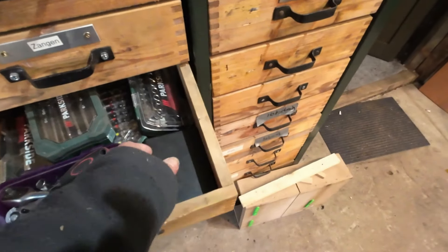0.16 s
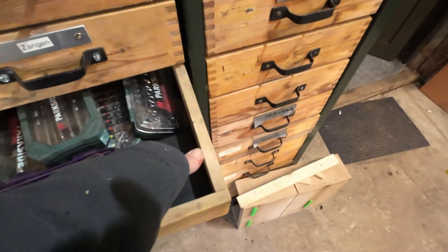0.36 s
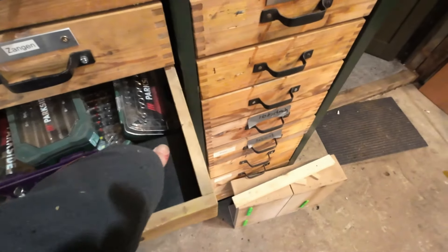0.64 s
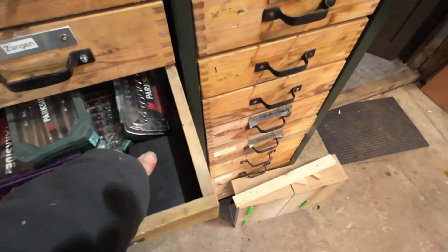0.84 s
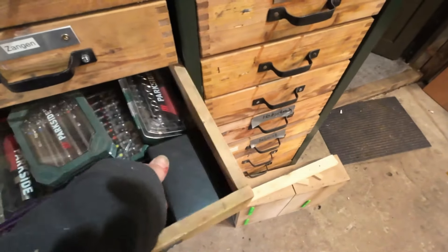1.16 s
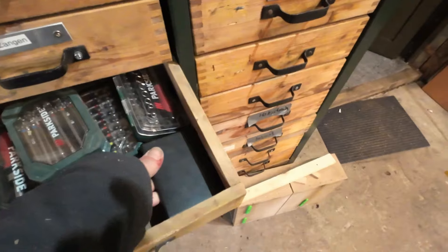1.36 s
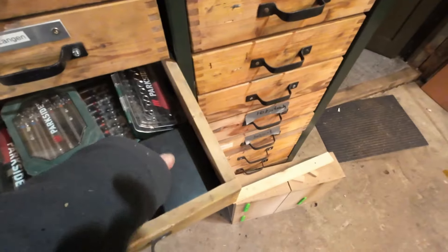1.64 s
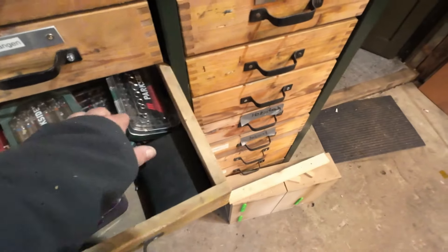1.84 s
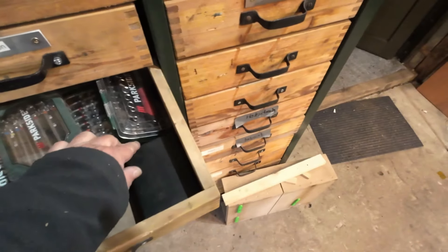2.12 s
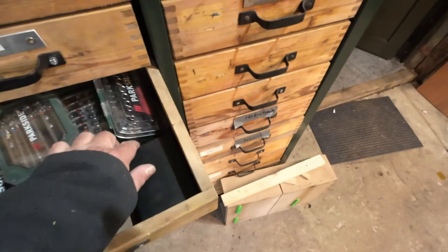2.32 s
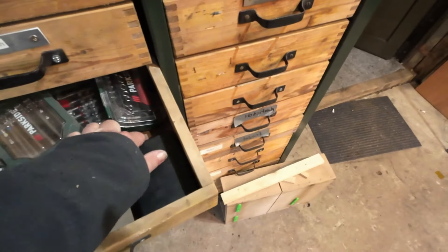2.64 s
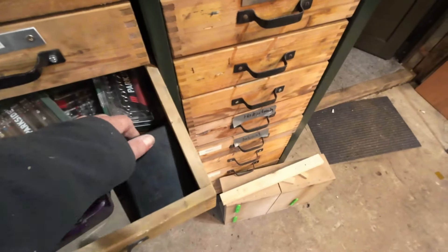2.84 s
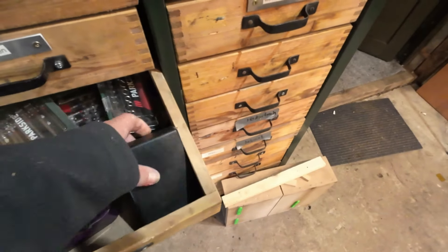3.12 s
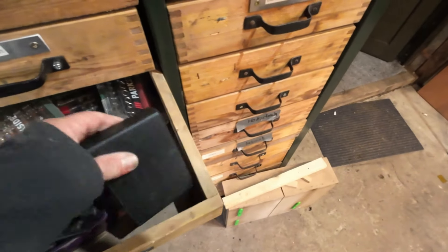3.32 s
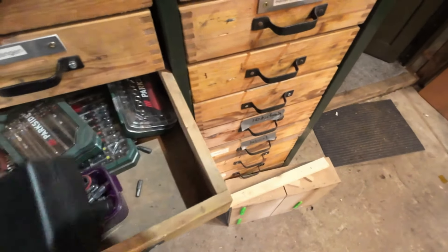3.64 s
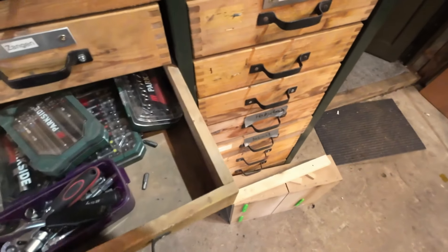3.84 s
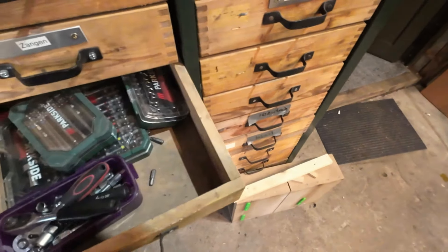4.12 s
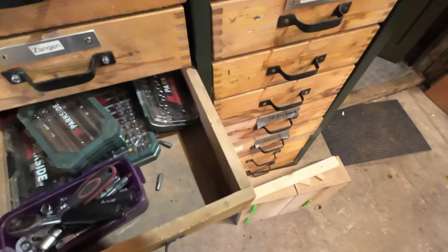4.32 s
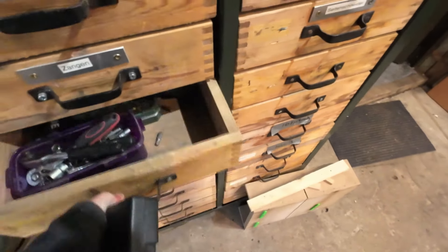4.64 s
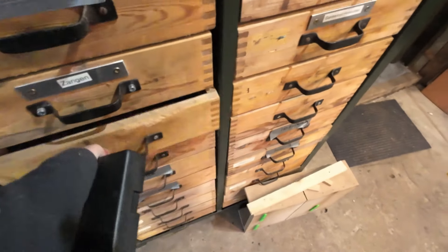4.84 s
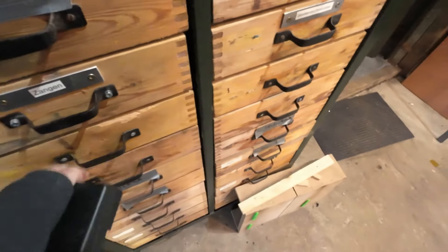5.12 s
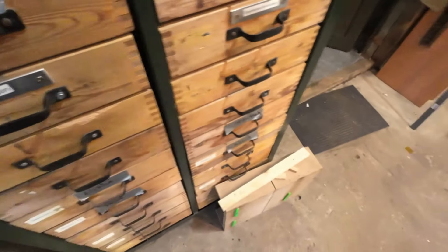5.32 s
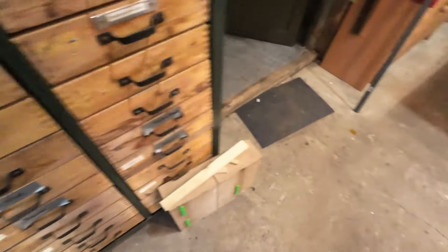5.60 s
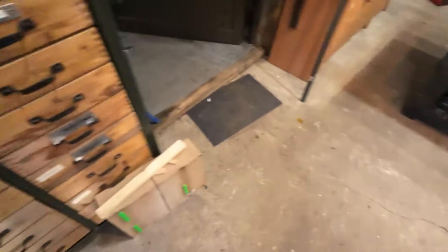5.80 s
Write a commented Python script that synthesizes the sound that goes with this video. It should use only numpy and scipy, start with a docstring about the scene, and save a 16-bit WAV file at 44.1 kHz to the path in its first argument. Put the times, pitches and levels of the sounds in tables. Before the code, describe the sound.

Sharp, bright plastic clacks and tiny metallic rattles over dull wooden knocks, with dragging and sleeve rustle between. The busiest rummaging comes early, softer taps follow, a hollow case slides out, then a pause. A hard knock starts the drawer moving; it scrapes inward, steel bits chink, and it closes with a woody thump. Close body-worn stereo microphone, short room echo, low wind-like puffs at the end.

```python
"""Small workshop: a hand rummages among plastic tool cases in an open wooden drawer, lifts one out, shuts it.
Contacts are blows and chatter heard through modes of wood, plastic shells and loose bits, with a room echo.
Rubs are noise in stick-slip grains; loose things rattle along; the lifted case rasps; steel bits ring. Air
buffets the two ports of a worn camera over a faint hiss of room and microphone."""
import sys
import numpy as np
from scipy import signal
from scipy.fft import rfft, irfft, next_fast_len
from scipy.io import wavfile
from scipy.ndimage import map_coordinates

SR = 44100
rng = np.random.default_rng(int(sys.argv[2]) if len(sys.argv) > 2 else 0)


def to_wav(sig):
    """Store sig (one row per channel, or 1-D mono) as 16-bit WAV at the path in sys.argv[1].

    Samples outside -1..1 are clipped; the rate is SR.
    """
    pcm = np.clip(np.atleast_2d(sig), -1, 1) * 32767
    pcm = np.round(pcm).astype(np.int16)
    wavfile.write(sys.argv[1], SR, pcm.T)  # frames by channels


N = 263277

# modes of the open drawer, its front, and the drawer in its cabinet: pitch_hz, width_hz, level_db
DRAWER_MODES = [(87.7, 19, -16.5), (185, 90, -9), (376.7, 80, -2.5), (564, 144, -5), (713.4, 182, -8)]
FRONT_MODES = [(237, 200, -9), (376, 131, -4), (472, 53, -1.5), (647, 60, -3.5), (840, 256, -10.5)]
CABINET_MODES = [(125, 71, -14.5), (206.5, 30, -1.5), (264.4, 151, -3.5), (432, 130, -9), (547, 42, -1.5),
                 (994, 270, -16)]
# modes of plastic case shells, of loose bits, of the lifted case: pitch_hz, width_hz, level_db
SHELL_MODES = [(950, 180, -4), (1195, 270, -0.5), (1403, 173, 1.5), (1595, 150, -2.5), (1837, 170, -1.5),
               (2096, 260, -4.5), (2400, 214, -3), (2621, 350, -6.5), (3266, 690, -11.5)]
BIT_MODES = [(3020, 380, 2.5), (5250, 380, 11.5), (5580, 3100, 6.5), (7920, 630, 5), (10220, 1600, 7.5),
             (12000, 14000, -0.5), (15300, 2600, 6.5)]
LIFTED_MODES = [(315, 13, -2), (616, 66, -1), (771, 39, 2.5), (1220, 160, -12), (1680, 42, -10),
                (1910, 59, -9), (3280, 140, -18.5), (5070, 510, -29.5)]
# small hollows that colour every rub: pitch_hz, width_hz, level_db
HOLLOW_MODES = [(2040, 980, 3), (2800, 290, 9.5), (3450, 160, 10), (4970, 400, 9.5), (5860, 400, 6),
                (7600, 260, 5), (10100, 2100, 5.5)]

# noise spectra of room tone, buffeting, drag on wood, plastic scrape, cloth and skin: freq_hz, density_db_per_hz
ROOM_TONE_SPECTRUM = [(59, -22), (100, -18.5), (177, -25.5), (255, 0), (308, -11), (634, -6.5), (950, -10),
                      (10900, -31), (16000, -37)]
BUFFET_SPECTRUM = [(5.9, -25.5), (10, 12), (63, -4), (143, -25), (188, -43.5), (226, -35.5), (300, -33),
                   (390, -68), (660, -120)]
DRAG_SPECTRUM = [(47, -38), (80, -2), (239, -5), (384, -8.5), (431, -7.5), (735, -7), (995, -15.5),
                 (1310, -13.5), (2500, -37.5), (3250, -52.5), (5500, -120)]
SCRAPE_SPECTRUM = [(500, -28.5), (1000, -0.5), (2000, 0), (3000, -2.5), (4200, -8), (8000, -21)]
CLOTH_SPECTRUM = [(1760, -24), (3000, -16), (4290, -18.5), (5820, -12), (6570, -9.5), (8870, -13.5),
                  (11100, -8.5), (13200, -16), (15800, 5.5), (16200, -32), (16500, -69.5)]

# left-right likeness of drawer sound and of room tone: freq_hz, likeness_0_to_1
DRAWER_LIKENESS = [(60, 1), (300, 1), (700, 1), (1400, 1), (3100, 0.99), (4600, 0.84), (6800, 0.81),
                   (15000, 0.23)]
ROOM_LIKENESS = [(100, .9), (1000, .85), (8000, .2)]
# reverberation time: freq_hz, t60_s
SHOP_T60 = [(100, 0.31), (300, 0.35), (700, 0.17), (2000, 0.28), (6000, 0.28), (14000, 0.07)]
# strength of the room's answer: freq_hz, level_db
WALL_RESPONSE = [(100, -7.5), (250, 0), (1000, -0.5), (4000, -13), (12000, -10)]
# drawer sound, left over right: freq_hz, balance_db
LEFT_OVER_RIGHT = [(1500, 0.5), (2400, 0.5), (4400, 3.5), (8000, -0.6)]
# microphone response: freq_hz, level_db
MICROPHONE_RESPONSE = [(3400, -0.5), (4100, 1.5), (4800, 2), (10500, -3.5), (12000, -3), (13300, -15.5),
                       (15500, -23.5)]

# buffeting: time_s, level_db
AIR_LEVELS = [(0, -48.5), (.24, -48.5), (.35, -42), (.51, -49), (.83, -40.5), (.97, -48.5), (1.07, -43),
              (1.34, -36), (1.7, -48.5), (1.79, -42), (2.07, -52), (2.44, -49), (2.66, -43.5),
              (2.79, -47.5), (2.95, -48), (3.31, -53), (3.95, -51), (4.72, -46), (4.95, -52), (5.03, -38.5),
              (5.4, -48), (5.72, -49.5)]
# single puffs on the ports as the camera swings round: time_s, level_db
AIR_PUFFS = [(5.762, -32), (5.779, -32.5), (5.842, -26.5), (5.872, -37), (5.908, -26.5), (5.956, -30)]
# strokes of hand, sleeve and cases: start_s, swell_s, hold_s, drag_db, scrape_db, cloth_db
RUB_STROKES = [(-.02, 0.01, 0.0046, -46, -58.5, -62), (0.02, 0.037, 0.0035, -45, -65, -58),
               (0.173, 0.021, 0.097, -52, -62, -53), (0.336, 0.0068, 0.042, -47.5, -57, -49.5),
               (0.403, 0.021, 0.14, -59.5, -80.5, -66), (0.537, 0.0094, 0.028, -70, -78, -62.5),
               (0.61, 0.0078, 0.018, -61, -67.5, -52), (0.69, 0.055, 0.0095, -42.5, -55.5, -49.5),
               (0.897, 0.025, 0.063, -52, -65, -51.5), (0.964, 0.051, 0.039, -43, -60, -55),
               (1.016, 0.023, 0.019, -36.5, -40.5, -43), (1.069, 0.016, 0.16, -57, -49.5, -49.5),
               (1.13, 0.08, 0.049, -39.5, -41.5, -41), (1.313, 0.031, 0.18, -49, -58, -58),
               (1.692, 0.04, 0.029, -48.5, -54, -52), (1.78, 0.0071, 0.079, -60, -49.5, -55),
               (1.91, 0.0087, .04, -52, -56, -58), (1.891, 0.078, 0.068, -62, -75, -69),
               (2.169, 0.0057, 0.015, -49.5, -63.5, -53.5), (2.327, 0.043, 0.021, -54, -66, -65),
               (2.454, 0.024, 0.086, -50, -60.5, -57), (2.497, 0.052, 0.036, -51, -52.5, -46.5),
               (2.602, 0.013, 0.021, -48, -57.5, -53), (2.7, 0.005, 0.0075, -47, -63, -63),
               (2.741, 0.013, 0.025, -45.5, -62, -59), (2.826, 0.016, 0.0062, -39, -59.5, -58),
               (2.909, 0.022, 0.1, -53, -70, -67), (3.046, 0.016, 0.017, -52.5, -56, -51.5),
               (3.14, 0.032, 0.026, -45.5, -55, -46.5), (3.24, 0.034, 0.022, -53, -61.5, -53.5),
               (3.6, 0.13, 0.044, -57, -64.5, -54), (3.727, 0.14, 0.11, -81, -71, -50),
               (4.033, 0.023, 0.0079, -53.5, -67, -55), (4.111, 0.0055, 0.04, -35, -45.5, -44),
               (4.982, 0.0048, 0.053, -25.5, -45.5, -53), (5.098, 0.019, 0.06, -52, -67, -73),
               (5.201, 0.013, 0.035, -56, -66.5, -88), (5.246, 0.013, 0.096, -62, -99, -100),
               (5.453, 0.049, 0.06, -72.5, -67.5, -59), (5.722, 0.11, 0.055, -67, -58, -46)]
# between strokes: drag_db, scrape_db, cloth_db
IDLE_LEVELS = [-72.5, -82, -72.5]
# the drawer runs in: time_s, drag_db, scrape_db, cloth_db
SLIDE_LEVELS = [(4.19, -74, -69, -53), (4.23, -36.5, -51.5, -47), (4.3, -47, -55.5, -54),
                (4.34, -42, -42, -75), (4.365, -48.5, -57, -57), (4.52, -49.5, -60.5, -55.5),
                (4.58, -49.5, -57.5, -46), (4.73, -44, -48.5, -41), (4.83, -51, -50.5, -43),
                (4.98, -48.5, -53.5, -47.5)]
# contacts: start_s, tick_db, knock_re_tick_db, clack_re_tick_db, chatter_s (scaled per body),
# wood_tilt_db_per_octave
CONTACT_EVENTS = [(0.068,-25,-18,-16,0.004,8),(0.262,-52.5,4,6,0.0052,1),(0.2755,-52.5,18.5,16,0.0053,-3),(0.318,-33,17.5,0,0.015,6.5),(0.324,-29.5,1.5,8.5,0.0041,-4.5),
                  (0.3338,-32,11,6.5,.009,-13),(.346,-42,-10,17,0.0048,4),(0.361,-38,-20,-22,.006,0.5),(.418,-37,-7,-24,0.0069,-7),
                  (0.65,-43.5,1,-8.5,.0045,-4),(0.7172,-55,26.5,8,0.014,2),(0.765,-49,13,-3,0.0083,0),(0.817,-40.5,-9,-15,0.0057,1),
                  (1.026,-19.5,-26,-8.5,0.0066,11),(1.0364,-15,-3,0.5,0.0063,5),(1.181,-19,4.5,-6,0.018,2.5),
                  (1.191,-19.5,-8.5,-4.5,.008,-13),(1.224,-42,13,15,0.007,10),(1.231,-30,12.5,11.5,0.0062,-0.5),(1.2378,-23.5,5,-1.5,0.02,12),(1.2516,-32,7,-7,0.0076,-5),
                  (1.261,-37,13.5,-2,0.011,0),(1.282,-42,12.5,11,0.0061,7),(1.295,-36,11,5,.008,-7.5),(1.308,-21.5,-9,1,0.0049,-4),(1.323,-37.5,3,6,0.0034,-9),
                  (1.356,-51.5,18.5,-3,0.013,-13),(1.3886,-28,-21,-9,0.0054,-4.5),(1.417,-37,3.5,2,0.0055,-13),(1.459,-35,-16.5,-24.5,0.0034,4.5),
                  (1.474,-37,-3.5,-6,0.0056,-1.5),(1.491,-42,3,13.5,0.005,-5),(1.514,-33,-4,-6,0.0041,-4.5),(1.527,-36,5.5,-4.5,0.0089,-8),
                  (1.762,-34,12,7,0.0067,3.5),(1.781,-11.5,10,3.5,0.0096,0.5),
                  (1.7888,-18,4,-7,0.02,-2.5),(1.804,-31.5,8.5,-6,0.011,-9),(1.819,-37,-13.5,8,0.01,1.5),(1.838,-21,-8.5,-8.5,.009,2),
                  (1.9029,-27,20.5,16.5,0.0033,10),(1.911,-33.5,1.5,13,0.0036,3),(1.9687,-41,20.5,18.5,0.011,9.5),(1.996,-26,-2,-6.5,0.015,7.5),
                  (2.1721,-44.5,16.5,5,0.0038,-1.5),(2.216,-57,15,15.5,0.0056,-9),(2.223,-42,10.5,-2.5,0.0073,-2),(2.328,-62.5,27.5,4,0.013,-6.5),(2.401,-49.5,13.5,5.5,0.0054,-1),
                  (2.5913,-25,6.5,-9.5,0.0037,2.5),(2.619,-39,-5,-22,0.0223,-11),(2.654,-54.5,26,-5,0.0093,-3.5),(2.6855,-39.5,18.5,7,0.0043,2),
                  (2.7,-58,29,5,0.0075,4),(2.71,-31.5,-5,-16,0.0061,-7),(2.7556,-38.5,4.5,5.5,0.0038,-2),(2.807,-54.5,-7,10,0.0011,0.5),(2.814,-55.5,21.5,13.5,.006,-9.5),(2.84,-43,10.5,-11,0.012,11),(2.854,-36,7.5,-0.5,0.006,4),
                  (2.867,-38.5,-21,-5,0.0073,0.5),(2.898,-39,1,-12,0.015,-8),(2.9784,-48,20.5,15.5,0.0078,6),(2.993,-41,-5,-17,.008,-4),
                  (3.036,-35,-20,-11.5,0.01,5),(3.077,-34.5,16.5,14,0.0069,-3.5),(3.151,-42,13.5,-16,0.0093,-1),(3.175,-43,-1,7.5,0.0079,-2),
                  (3.708,-55.5,20.5,9.5,0.0059,8),(3.715,-36,-4.5,-17,0.0036,18),(3.734,-49,10,-6,.006,12),(3.779,-43,8,1,0.0025,13.5),(3.787,-59.5,24,12.5,0.0067,15),
                  (4.019,-55,21.5,-1,0.0093,2),(4.039,-30,-27,-16,0.0092,-2),(4.0618,-41.5,2,0.5,0.025,-6),
                  (4.1085,-13.5,3.5,4.5,0.009,3.5),(4.131,-22,8.5,-0.5,0.0091,6.5),(4.1623,-40,-7,8.5,0.0081,5),(4.222,-42.5,-2,7,0.0071,-7),
                  (4.2312,-33.5,-7,7.5,.007,9),(4.275,-40.5,10,6,0.0058,1),(4.314,-37,6.5,-13,0.024,21),(4.329,-46,14,14.5,.012,9),(4.341,-35.5,8,9.5,0.016,-4.5),
                  (4.436,-27,-13,-10.5,0.012,-2),(4.579,-28.5,-7,-9.5,0.016,-0.5),(4.587,-26.5,-7.5,-2.5,0.016,-10),(4.6704,-24,-17,-13,.01,2),(4.695,-40.5,21,7,0.0086,-6),
                  (4.721,-26.5,-32,-33,0.018,4.5),(4.78,-38.5,-3,-1.5,0.018,12),
                  (4.924,-49.5,17,-12,.014,-1),(4.983,-16,10,2.5,0.011,-0.5),(4.998,-29.5,6.5,5.5,.015,10.5),
                  (5.0098,-31.5,-19,10.5,0.0082,2),(5.0234,-55.5,32.5,27,0.012,13),(5.052,-63,23,13,0.011,-8.5),(5.089,-50,11,7,0.01,2),
                  (5.1072,-44,-15,2.5,0.025,5),(5.1302,-43.5,6.5,-14,0.016,-5),(5.2157,-60,23,12,0.0072,-10),(5.24,-69,30.5,23.5,0.012,3),
                  (5.367,-68.5,23.5,-7,0.014,-12),(5.542,-71,19,10.5,0.019,9)]
# small steel bits: start_s, pitch_hz, level_db
CHINK_EVENTS = [(1.256, 2330, -19), (1.344, 3600, -36), (1.868, 1850, -28), (4.66, 4800, -37),
                (4.673, 6900, -27), (4.706, 3300, -27.5), (4.72, 2900, -35), (4.738, 4700, -32),
                (4.782, 5960, -31)]
# one case slides out past its neighbours: time_s, level_db
LIFT_LEVELS = [(3.14, -58), (3.148, -43), (3.208, -37), (3.266, -55), (3.304, -53), (3.345, -72)]

PUSHED_S, SHUT_S = 3.9, 4.96  # hand at the drawer front from; drawer in the cabinet from
STROKE_RISE_DB, FADE_DB_PER_S = 15.5, 296  # a stroke starts this far down; dies this fast
BOUNCE_SWELL_S = 0.00083
PUFF_S = 0.0033  # before random spread
CHINK_CYCLES = 55  # cycles to lose 60 dB
ROOM_DB, ECHO_DB = -72.5, -11.5
PORT_LAG_S = 2.2e-5
TOP_HZ = 16700


def amp(db):
    """Gain of a level in dB."""
    return 10 ** (np.asarray(db) / 20)


def power(db):
    """Power of a level in dB."""
    return 10 ** (np.asarray(db) / 10)


def unit(x):
    """x at rms 1."""
    return x / np.sqrt(np.mean(x ** 2) + 1e-20)


def along(points, hz):
    """Values of (freq_hz, value) points, interpolated on a log axis."""
    f, v = np.transpose(points)
    return np.interp(np.log(hz + 1), np.log(f + 1), v)


def curves(rows):
    """One value per sample for each column after the time."""
    s, *cols = np.transpose(rows)
    return [np.interp(np.arange(N) / SR, s, c) for c in cols]


def wobble(knots_per_s):
    """A smooth random curve through normal knots."""
    knots = rng.standard_normal(int(N * knots_per_s / SR) + 4)
    return map_coordinates(knots, [np.arange(N) * knots_per_s / SR])


def filtered(x, response):
    """x times a complex response of frequency."""
    m = next_fast_len(x.shape[-1] + SR // 4)
    spectrum = rfft(x, m) * response(np.fft.rfftfreq(m, 1 / SR))
    return irfft(spectrum, m)[..., :x.shape[-1]]


def resonances(modes, gains=1):
    """Causal response of a body: a sum of damped modes of alternating sign."""
    gains = gains * np.ones(len(modes))

    def response(f):
        total = 0
        for k, (gain, (hz, width_hz, level_db)) in enumerate(zip(gains, modes)):
            damping = 1j * f * width_hz
            total = total + (-1) ** k * gain * amp(level_db) * damping / (hz * hz - f * f + damping)
        return total

    return response


def ports(pair, likeness):
    """Two unrelated signals mixed to left and right with a given likeness at each frequency."""
    def mid_side(hz):
        turn = np.arccos(np.clip(along(likeness, hz), -1, 1)) / 2
        return np.array([np.cos(turn), np.sin(turn)])

    mid, side = filtered(pair, mid_side)
    return np.array([mid + side, mid - side])


def rush(spectrum, likeness, grain_db, grains_per_s):
    """Stereo noise of rms 1 whose level is broken into grains."""
    pair = rng.standard_normal((2, N)) * amp(grain_db * wobble(grains_per_s))
    return unit(ports(filtered(pair, lambda hz: amp(along(spectrum, hz))), likeness))


def room_tone():
    """Faint steady hiss of the room and of the microphone itself, slightly uneven, partly different at each
    port."""
    return amp(ROOM_DB) * rush(ROOM_TONE_SPECTRUM, ROOM_LIKENESS, grain_db=2, grains_per_s=10)


def buffeting():
    """Slow pressure lumps as the camera moves through the air, partly different at each port."""
    lumps = rush(BUFFET_SPECTRUM, [(20, 0.87), (100, 0.25)], grain_db=4.5, grains_per_s=54)
    air = amp(curves(AIR_LEVELS)[0]) * lumps
    t = np.arange(N) / SR
    for s, level_db in AIR_PUFFS:
        stretch, turn = rng.standard_normal(2) * [0.1, 0.3]
        u = ((t - s) / (PUFF_S * np.exp(stretch))) ** 2
        # mostly one way at both ports, unevenly shared
        share = np.cos([[turn - np.pi / 4], [turn + np.pi / 4]])
        air -= amp(level_db) * share * (1 - 0.74 * u) * np.exp(-u / 2)
    return air


def effort():
    """Drag, scrape and cloth levels in dB: strokes swell, hold and fade; the drawer's run adds power."""
    t = np.arange(N) / SR
    running = (t > SLIDE_LEVELS[0][0]) & (t < SLIDE_LEVELS[-1][0])
    total = power(IDLE_LEVELS)[:, None] + running * power(curves(SLIDE_LEVELS))
    for start, swell, hold, *levels_db in RUB_STROKES:
        rise_db = -STROKE_RISE_DB * np.clip(1 - (t - start) / swell, 0, 9)
        fade_db = -FADE_DB_PER_S * np.clip(t - start - swell - hold, 0, 1)
        total += power(levels_db)[:, None] * power(rise_db + fade_db)
    return 10 * np.log10(total)


def rings(s, hz, gain, cycles):
    """A short damped sine at each time, for both paths of a pair; 60 dB lost in the given cycles."""
    t = np.arange(SR // 25) / SR
    decay = amp(-60 * t * hz[:, None] / cycles)
    swell = 1 - np.exp(-t / BOUNCE_SWELL_S)
    waves = gain[:, None] * decay * np.sin(2 * np.pi * hz[:, None] * t) * swell
    other = waves * rng.standard_normal((len(s), 1))
    at = (np.round(s * SR).astype(int)[:, None] + np.arange(len(t))).ravel()
    return np.array([np.bincount(at, w.ravel(), N + SR)[:N] for w in (waves, other)])


def rattles(scrape_db, per_s):
    """Loose things jostle at random, as hard as the cases scrape: shells clack, bits ring at own pitches."""
    now = rng.random(N) < per_s / SR
    size_db = 3 * np.minimum(rng.exponential(size=N), 3)
    jolts = now * amp(size_db) * rng.standard_normal((2, N))
    clacks = unit(ports(filtered(jolts, resonances(SHELL_MODES)), DRAWER_LIKENESS))
    when, pitch, softness = rng.random((3, int(per_s * N / SR)))
    bits_hz = 3000 * np.exp(1.1 * (2 * pitch - 1))
    bits = rings(when * N / SR, bits_hz, amp(-20 * softness), cycles=40)
    bits = unit(ports(bits, DRAWER_LIKENESS))
    return amp(scrape_db) * (amp(-10) * clacks + amp(-7) * bits)


def rubbing():
    """Cases drag over wood and scrape each other in stick-slip grains; sleeve and fingers hiss."""
    drag_db, scrape_db, cloth_db = effort()
    slip = wobble(45)
    drag = rush(DRAG_SPECTRUM, DRAWER_LIKENESS, grain_db=3.5, grains_per_s=200)
    scrape = rush(SCRAPE_SPECTRUM, DRAWER_LIKENESS, grain_db=3, grains_per_s=300)
    cloth = rush(CLOTH_SPECTRUM, DRAWER_LIKENESS, grain_db=1.8, grains_per_s=400)
    drag = amp(drag_db + 1.8 * slip) * drag
    scrape = amp(scrape_db + 1.5 * slip) * scrape
    cloth = amp(cloth_db + 1.2 * slip) * cloth

    t = np.arange(N) / SR
    stages = [(DRAWER_MODES, t < PUSHED_S),
              (FRONT_MODES, (t >= PUSHED_S) & (t < SHUT_S)),
              (CABINET_MODES, t >= SHUT_S)]
    wooden = 0
    for modes, now in stages:
        wooden = wooden + filtered(drag * now, lambda hz: 0.63 + np.abs(resonances(modes)(hz)))
    fine = filtered(scrape + cloth, lambda hz: 0.59 + 0.26 * np.abs(resonances(HOLLOW_MODES)(hz)))
    return wooden + fine + rattles(scrape_db, per_s=160)


def struck(force, modes, spread_db, scatter):
    """A body's answer to a force, peak 1 per row; each blow varies mode strengths and pitches."""
    gain, shift = rng.standard_normal((2, len(modes)))
    modes = [(hz * (1 + scatter * d), width, db) for (hz, width, db), d in zip(modes, shift)]
    ring = filtered(force, resonances(modes, amp(spread_db * gain)))
    return ring / (np.abs(ring).max(axis=-1, keepdims=True) + 1e-20)


def contacts():
    """A blow plus swelling, then dying chatter of micro-bounces, heard through wood, shell and bits."""
    out = np.zeros((2, N + SR))
    t = np.arange(1, SR // 6) / SR
    push = t * np.exp(-t / (0.29 * BOUNCE_SWELL_S))
    push /= push.sum()

    def dying(length_s):
        return np.exp(-(t / length_s) ** 1.14)

    for s, tick_db, knock_db, clack_db, chatter_s, tilt_db in CONTACT_EVENTS:
        # longer chatter, stronger push; straight path only
        blow = 0.49 * np.sqrt(chatter_s * SR) * push * np.array([[1], [0]])
        wood = DRAWER_MODES if s < PUSHED_S else FRONT_MODES if s < SHUT_S else CABINET_MODES
        # the place struck favours low or high modes
        wood = [(hz, width, db + tilt_db * np.log2(hz / 400)) for hz, width, db in wood]
        # per body: one row for the straight path, one for the many short paths in the drawer
        bounce = rng.standard_normal((3, 2, len(t))) * amp(2.6 * rng.standard_normal(len(t)))
        bounce *= 1 - np.exp(-t / BOUNCE_SWELL_S)
        # bright chatter stops sooner than heavy chatter
        tick_force = bounce[0] * dying(0.35 * chatter_s)
        clack_force = 1.5 * blow + bounce[1] * dying(0.95 * chatter_s)
        knock_force = 2.5 * blow + bounce[2] * dying(1.2 * chatter_s)
        tick = struck(tick_force, BIT_MODES, spread_db=3.5, scatter=0.035)
        clack = struck(clack_force, SHELL_MODES, spread_db=2, scatter=0.02)
        knock = struck(knock_force, wood, spread_db=2, scatter=0.015)
        hit = tick + amp(clack_db) * clack + amp(knock_db) * knock
        out[:, round(s * SR):][:, :len(t)] += amp(tick_db) * hit
    return out[:, :N]


def shop(x):
    """Drawer walls and workshop answer: noise tails, each frequency dying at its own speed."""
    out = np.zeros((2, N + SR))
    step = int(0.3 * SR)  # a new tail for each step
    for start in range(0, N, step):
        hz, t, z = signal.stft(rng.standard_normal((2, SR // 2)), SR, nperseg=256)
        decay = amp(-60 * t / along(SHOP_T60, hz)[:, None])
        mid, side = signal.istft(z * decay, SR, nperseg=256)[1]
        # long waves reach both ports alike
        side = filtered(side, lambda f: np.clip(f / 7000, 0.08, 1))
        tail = np.array([mid + side, mid - side]) / np.linalg.norm(mid)
        wet = signal.fftconvolve(x[None, start:start + step], tail, axes=1)
        out[:, start + 60:][:, :wet.shape[1]] += wet
    return out[:, :N]


def chinks():
    """Steel bits touch and ring as damped sines at their own pitch."""
    s, hz, level_db = np.transpose(CHINK_EVENTS)
    return ports(rings(s, hz, amp(level_db), CHINK_CYCLES), DRAWER_LIKENESS)


def lifting():
    """The rasp of the lifted case: gritty noise through the modes of its hollow shell."""
    grit = rng.standard_normal((2, N)) * amp(1.3 * wobble(150))
    rasp = unit(ports(filtered(grit, resonances(LIFTED_MODES)), DRAWER_LIKENESS))
    t = np.arange(N) / SR
    sliding = (t > LIFT_LEVELS[0][0]) & (t < LIFT_LEVELS[-1][0])
    return sliding * amp(curves(LIFT_LEVELS)[0]) * rasp


def scene():
    """Everything as it reaches the two ports; the drawer is a little nearer to the left one."""
    hits = contacts()
    to_walls = filtered(hits[0], lambda hz: amp(along(WALL_RESPONSE, hz)))
    echo = amp(ECHO_DB) * shop(to_walls)
    drawer = rubbing() + ports(hits, DRAWER_LIKENESS) + echo + chinks() + lifting()
    left, right = np.array([[1], [0]]), np.array([[0], [1]])

    def placing(hz):
        balance = amp(along(LEFT_OVER_RIGHT, hz) * (left - right) / 2)
        return balance * np.exp(-2j * np.pi * hz * PORT_LAG_S * right)

    return room_tone() + buffeting() + filtered(drawer, placing)


def record(dry):
    """Preamplifier rounds off the loudest peaks; microphone dips in the high treble, stops at TOP_HZ."""
    rounded = dry / (1 + np.abs(dry / 0.8) ** 4) ** (1 / 4)
    return filtered(rounded, lambda hz: amp(along(MICROPHONE_RESPONSE, hz)) * (hz < TOP_HZ))


dry = scene()
out = record(dry)
to_wav(out)
```